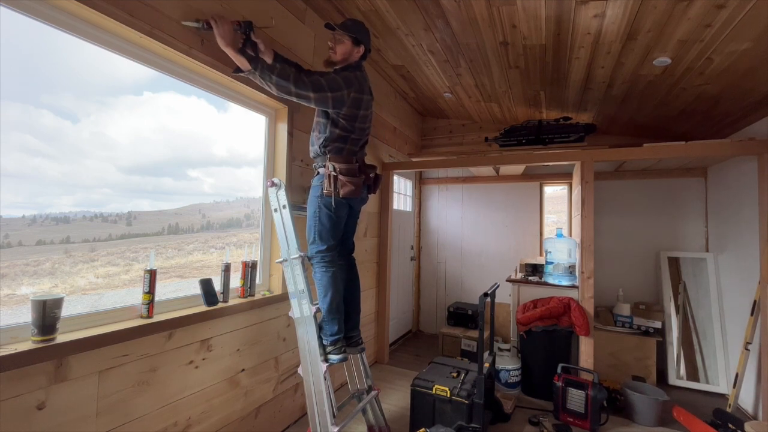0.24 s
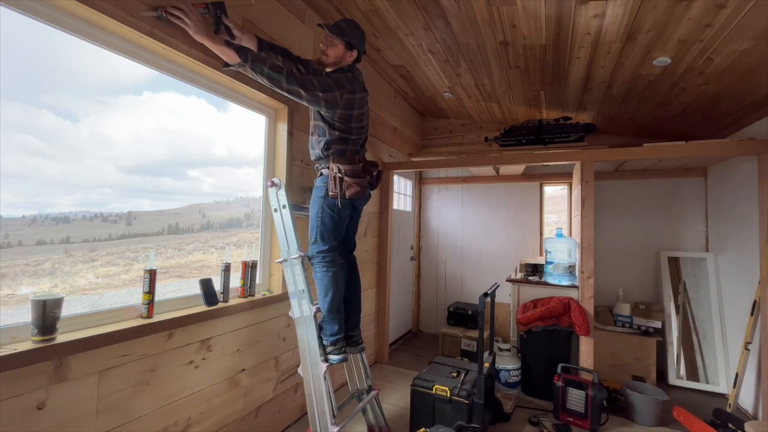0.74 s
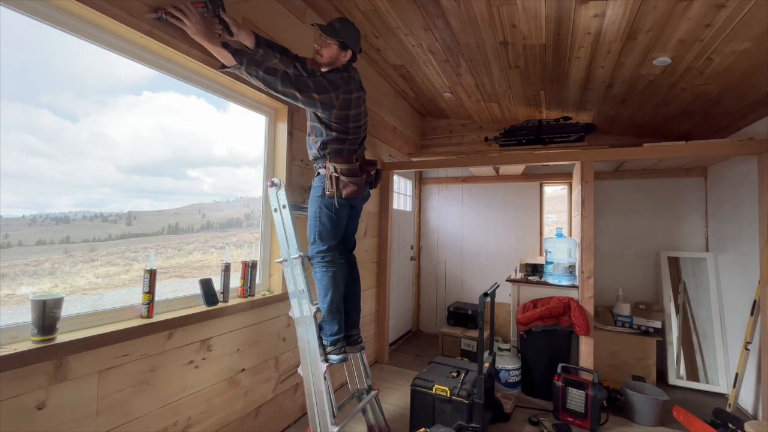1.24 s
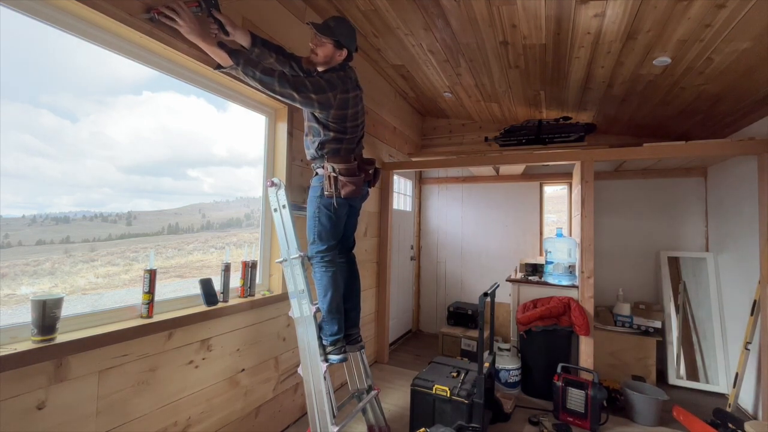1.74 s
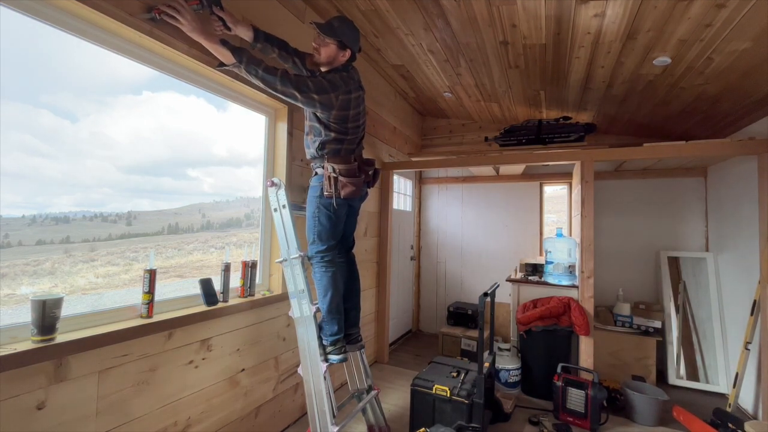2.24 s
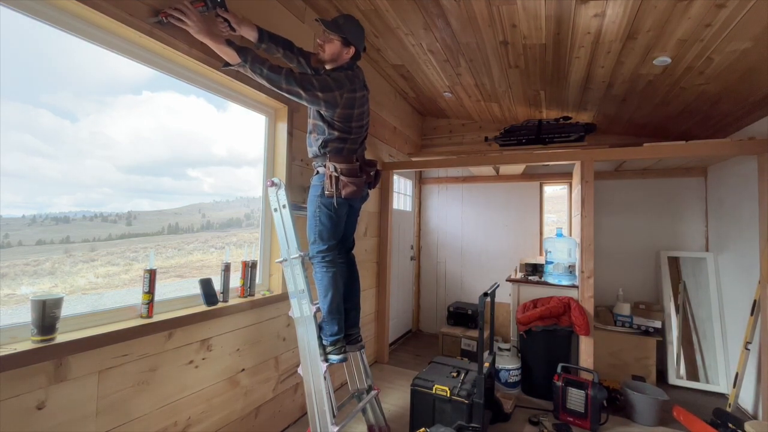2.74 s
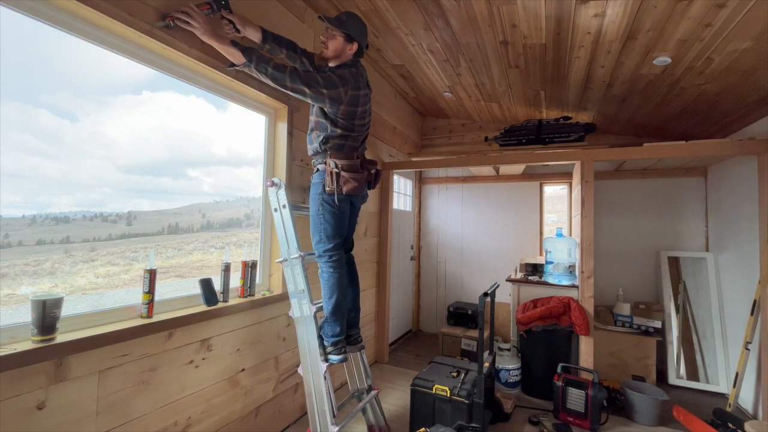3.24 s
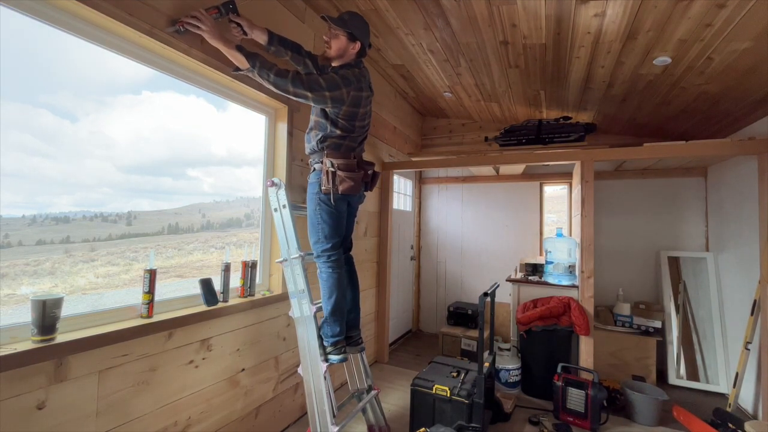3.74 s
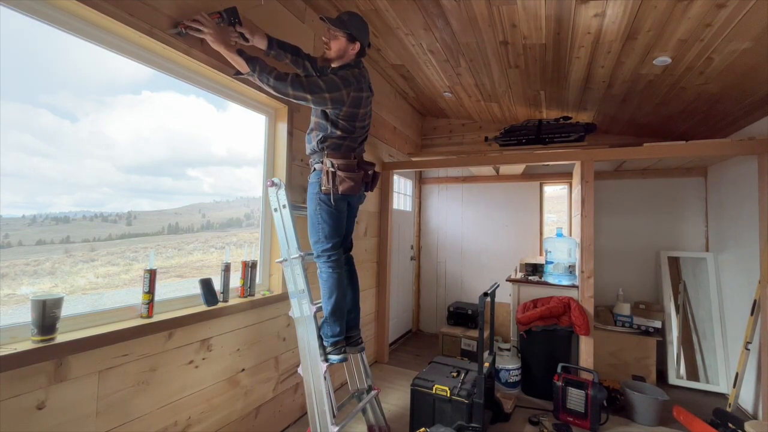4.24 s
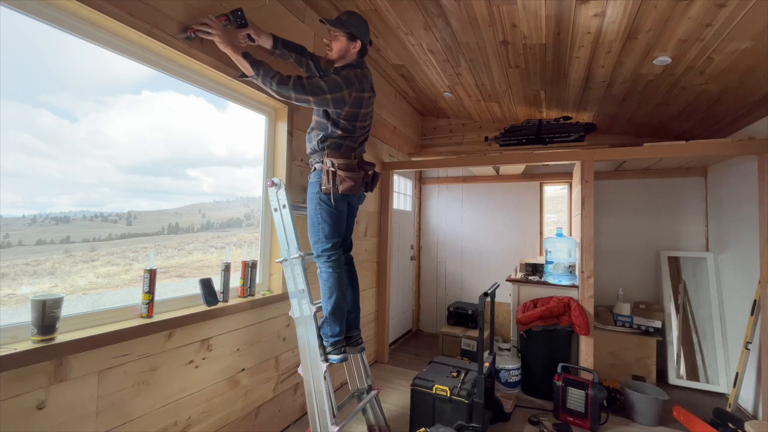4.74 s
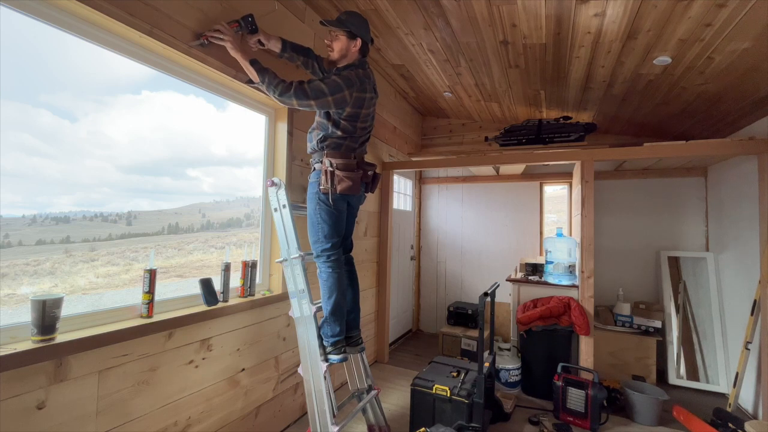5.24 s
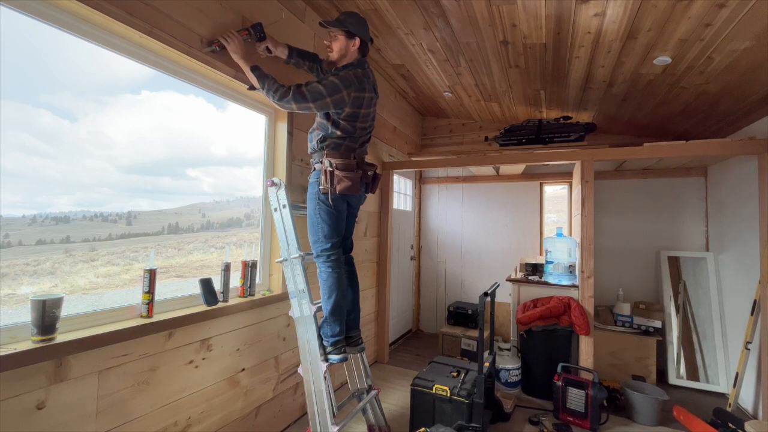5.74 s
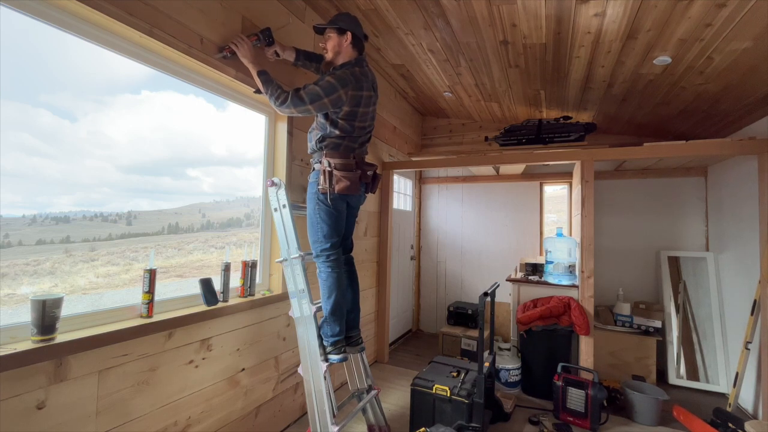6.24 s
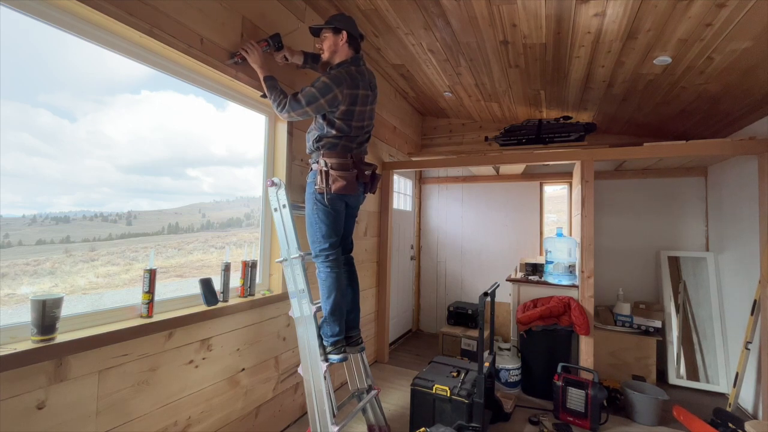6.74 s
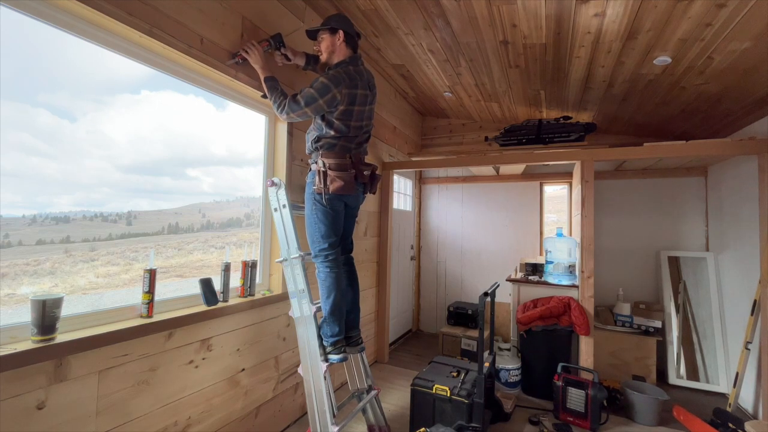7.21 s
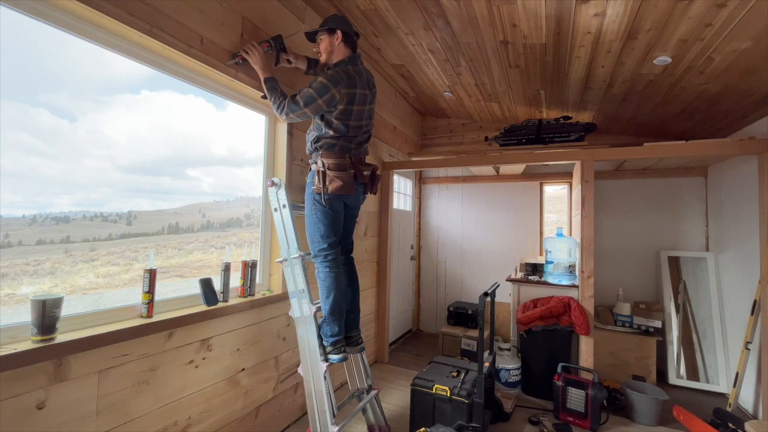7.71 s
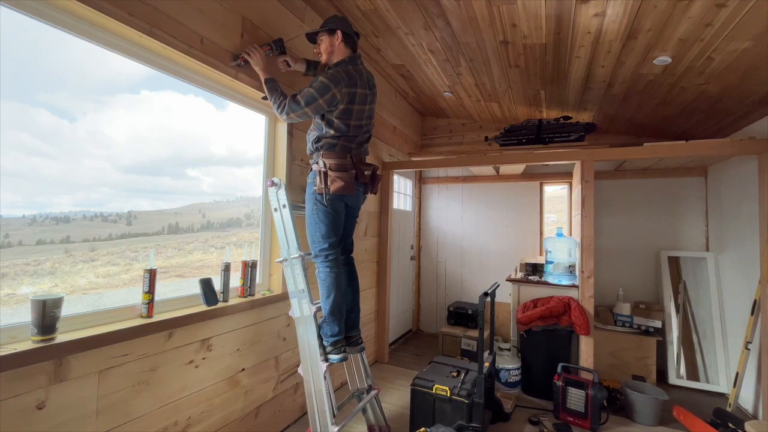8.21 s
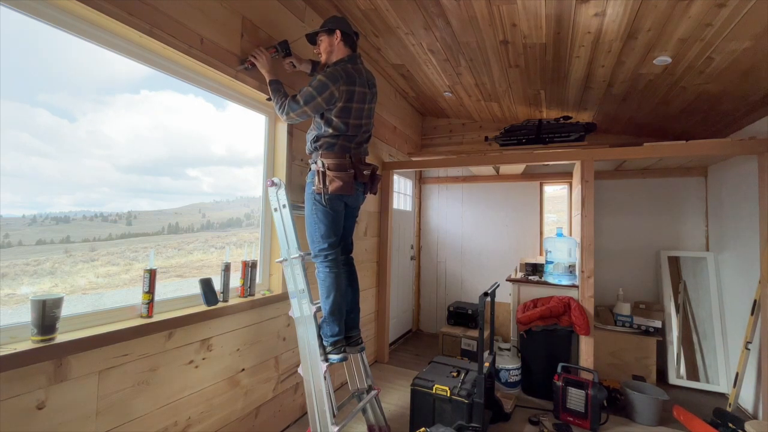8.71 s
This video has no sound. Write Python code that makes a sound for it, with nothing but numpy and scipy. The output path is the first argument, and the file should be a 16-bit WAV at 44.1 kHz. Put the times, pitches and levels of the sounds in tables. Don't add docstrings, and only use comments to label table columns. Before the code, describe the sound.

In a small wooden cabin, a metal caulking gun is worked a few metres from a stereo microphone. Light ticks, small dry ladder pips and sleeve rubs come first, with a full palm thump on a ceiling board. After a quiet gap, one sharp steel snap rings out; later come clusters of harder clacks with loose rattles. A short woody echo follows each over a faint outdoor hush.

```python
import sys
import numpy as np
from scipy import signal
from scipy.fft import rfft, irfft, next_fast_len
from scipy.io import wavfile
from scipy.ndimage import uniform_filter1d

SR = 44100
rng = np.random.default_rng(int(sys.argv[2]) if len(sys.argv) > 2 else 0)


def pcm_store(signal):
    levels = np.round(np.clip(np.atleast_2d(signal), -1, 1) * 32767)
    wavfile.write(sys.argv[1], SR, levels.astype(np.int16).T)


def invert_db(level):
    return 10 ** (np.asarray(level, dtype=float) / 20)


N = 395577


def at_hz(curve, hz):
    curve_hz, value = np.transpose(curve)
    return np.interp(np.log(np.maximum(hz, 1)), np.log(curve_hz), value)


def add(track, s, sound):
    i = int(s * SR)
    track[i:i + len(sound)] += sound[:len(track) - i]


def ring(modes, detune=0.0096):
    t = np.arange(SR // 10) / SR
    hz, db, t60 = np.transpose(modes)[:, :, None]
    sign = (-1) ** np.arange(len(modes))[:, None]
    hz = hz * (1 + detune * rng.standard_normal((len(modes), 1)))
    envelope = invert_db(db - 60 * t / np.maximum(t60, .0015))
    y = np.sum(sign * envelope * np.sin(2 * np.pi * hz * t), axis=0)
    return y / np.sqrt(np.sum(y ** 2))


def gun(blows, rattle_s, edge_db, echo_db=1.5):
    # (frequency [Hz], level [dB], t60 [s])
    barrel = [(170.1, -1, .06), (340, -2, 0.056), (443.3, -2, 0.074), (635, -14, 0.027),
              (920.8, -11.5, 0.0096)]
    frame = [(1180, -1.5, 0.015), (1400, 0.5, 0.019), (1641, -2, 0.031), (2100, 10, 0.0037)]
    plate = [(2782, -1.5, 0.0073), (3400, -1.5, 0.0034), (3740, -14.5, 0.039), (4250, -2.5, 0.0061),
             (4740, -16, .07), (4900, -1.5, 0.0044), (5430, -3.5, 0.0065), (5700, -19.5, 0.079),
             (6390, -3.5, 0.0065)]
    spring = [(7100, -3.5, 0.003), (8450, -3.5, 0.0043), (9500, -5.5, 0.0063), (9560, -16.5, 0.042),
              (10210, -5, .006), (11550, -3, 0.0056), (12500, -7, 0.0023)]
    edge = [(13700, -14.5, 0.01), (14800, -1, .003), (15400, -5.5, 0.0021)]
    part_db = [0, -10.5, -8, -6.5, -8.5]
    out = np.zeros((2, N))
    t = np.arange(int(2 * rattle_s * SR)) / SR
    for s, db, hz, barrel_db, plate_db, spring_db in blows:
        chatter = rng.standard_normal(len(t)) * (t / rattle_s) ** 0.4 * np.exp(-(t / rattle_s) ** 3)
        chatter = chatter / np.sqrt(np.sum(chatter ** 2))
        spot = [(hz, 0, .008)]
        spot_db = plate_db + 3 if hz > 2600 else 0
        levels = np.add([barrel_db, 0, plate_db, spring_db, spot_db, spring_db + edge_db], [*part_db, 0])
        gains = invert_db(db + levels) * np.sqrt(rattle_s * SR)
        body = sum(gain * ring(part) for gain, part in zip(gains, (barrel, frame, plate, spring, spot, edge)))
        add(out[0], s - .0015, signal.fftconvolve(body, chatter))
        add(out[1], s + rattle_s / 2, body * invert_db(echo_db))
    return out


def sprung(blows, per_plate_db, per_frame_db, offset_db):
    return [(*b, per_plate_db * b[-1] + per_frame_db * (b[1] + 42) + offset_db) for b in blows]


def snap_and_clacks():
    # (time [s], frame peak [dB], pitch of struck spot [Hz], barrel re frame [dB], plate re frame [dB])
    snap = [
        (3.917, -24.5, 1450, -15, .5),
    ]
    clacks = [
        (0.2575, -45, 1120, -15, -11),
        (0.903, -44, 1310, -8, -.5),
        (4.529, -43, 4290, -30, 10),
        (6.819, -42, 3250, -14.5, -1),
        (6.939, -28, 1550, -10, -7),
        (7.179, -43, 1300, -1, -1),
        (7.534, -31, 2100, -4.5, -7),
        (7.799, -40, 1340, -6.5, -4.5),
        (8.8255, -45.5, 3000, -16, -0.5),
        (8.943, -27.5, 1510, -20, -8.5),
    ]
    rattle_s = .006
    sharp = gun(sprung(snap, 1.1, .01, .3), rattle_s, edge_db=-7)
    return sharp + gun(sprung(clacks, 1.9, .7, -5), rattle_s, edge_db=-14)


def slack():
    # (time [s], frame peak [dB], pitch of struck spot [Hz], barrel re frame [dB], plate re frame [dB])
    leads = [(3.755, -56.5, 1450, -12, -9), (3.882, -57.5, 1780, -17, 6), (6.788, -70, 1700, -21.5, -3),
             (6.908, -51, 1730, -5.5, -5), (7.163, -43, 1400, -14, -7), (7.500, -54.5, 1550, -4.5, -7),
             (7.747, -55, 1570, -8, -15), (7.776, -51, 1400, -12, -8), (8.918, -46, 1480, -9.5, -4)]
    return gun(sprung(leads, .4, -.15, -13), rattle_s=0.018, edge_db=-18)


def ticks():
    # (time [s], frame peak [dB], pitch [Hz], plate re frame [dB], spring re frame [dB])
    plate_ticks = [(0.586, -51, 1690, -9, -12), (0.680, -57.5, 4000, 7.5, -21),
                   (1.251, -43.5, 1000, -12, -20), (2.220, -56.5, 1220, -10, -11),
                   (2.248, -54, 1250, -14.5, -11), (3.135, -65.5, 1350, -16, 1.5),
                   (4.479, -57, 4250, 11, -6.5), (4.500, -56.5, 4340, 10, -12), (4.520, -68, 5550, 6, 2),
                   (5.508, -72, 1424, -6, -2), (6.682, -60, 1440, -3, -9), (8.519, -63, 1540, -12, -18)]
    barrel_db = -30
    blows = [(s, db, hz, barrel_db, plate_db, spring_db) for s, db, hz, plate_db, spring_db in plate_ticks]
    return gun(blows, rattle_s=0.0017, edge_db=-12, echo_db=-1)


def thumps():
    # (time [s], peak level [dB])
    palm_hits = [
        (1.251, -19.5),
        (1.626, -45),
        (4.108, -47.5),
        (7.7, -59),
    ]
    # (frequency [Hz], level [dB], t60 [s])
    board = [(68, -22.5, 0.2), (139, -3.5, 0.024), (182.2, 8.5, 0.041), (244, 1.5, 0.014), (342, -4, 0.13),
             (463, -1.5, 0.028), (623, -8, 0.02), (890, -13, 0.037), (1024, -11, 0.013), (1400, -17, 0.011),
             (1750, -21, 0.0081), (2410, -23, 0.0047), (4000, -27, 0.0024), (8950, -30, .002)]
    out = np.zeros(N)
    for s, db in palm_hits:
        add(out, s, invert_db(db + 16) * ring(board))
    return out * invert_db([[-6], [6]])


def pips():
    # (time [s], peak level [dB], pitch [Hz])
    joint_pips = [(0.049, -50, 1200), (0.257, -44, 1110), (0.515, -43.5, 1030), (0.737, -42.5, 1340),
                  (0.995, -42, 1010), (1.016, -43.5, 1100), (1.017, -51, 861), (2.173, -45.5, 942),
                  (5.64, -48, 1350)]
    out = np.zeros(N)
    t = np.arange(SR // 100) / SR
    for s, db, hz in joint_pips:
        envelope = (t / 0.0016) * np.exp(1 - t / .0012)
        add(out, s - .001, invert_db(db + 1) * envelope * np.sin(2 * np.pi * hz * t))
    return out


def bands(length, alike_hz, low_hz=22, count=29):
    size = next_fast_len(length)
    f = np.arange(size // 2 + 1) * SR / size
    mid, side = rfft(rng.standard_normal((2, size)))
    share = np.sqrt(.5 / (1 + (alike_hz / np.maximum(f, 1)) ** 2))
    pair = mid * np.sqrt(1 - share ** 2) + side * share * np.array([[1], [-1]])
    pair, octave = pair.astype(np.complex64), np.log2(np.maximum(f, 1)).astype(np.float32)
    for hz in low_hz * 2 ** (np.arange(count) / 3):
        slope = np.clip(3 * (octave - float(np.log2(hz))), -1, 1)
        yield hz, irfft(pair * np.cos(slope * np.pi / 2) ** 2, size)[:, :length]


def cabin(dry, wet):
    # (frequency [Hz], t60 [s])
    decay = [(60, 0.73), (200, 0.4), (700, 0.28), (2000, 0.58), (5000, 0.45), (9000, 0.37), (15000, 0.083)]
    start_s, near_walls, near_s = 0.0075, 0.81, 0.045
    t = np.arange(int(.7 * SR)) / SR
    tail = sum(b * invert_db(-60 * t / at_hz(decay, hz)) for hz, b in bands(len(t), alike_hz=339))
    tail = tail * np.clip(t / start_s, 0, 1) ** 2 * (1 + near_walls * np.exp(-t / near_s))
    tail = tail / np.sqrt(np.sum(tail ** 2) / 2)
    early = np.zeros((2, 128))
    early[:, 0] = 1
    early[[0, 1], [70, 79]] = invert_db(1)
    direct = signal.fftconvolve(dry[None], early, axes=1)[:, :N]
    return direct + signal.fftconvolve(wet[None], tail, axes=1)[:, :N]


def strokes(t):
    # (peak time [s], peak level [dB], time to swell 20 dB [s], time to fade 20 dB [s], low part [dB])
    rubs = [(0.0, -64, .05, .2, 9), (.262, -60, .03, .4, 4), (.68, -65.5, .008, .3, -3),
            (.89, -62.5, .3, .03, 10), (.906, -53, .02, .12, -4), (1.41, -70, .03, .3, 19),
            (1.53, -63, .25, .13, 14), (1.696, -71, .07, .06, 11), (2.094, -63, .06, .09, 9),
            (2.25, -66, .04, .15, 7), (2.34, -66, .3, .065, 12), (3.172, -80, .13, .07, 9),
            (3.31, -88, .25, .04, 27), (3.76, -75, .015, .9, 13), (3.9, -58, .07, .03, .1),
            (5.304, -83.5, .1, .05, -2.5), (5.508, -65.5, .006, .045, -40), (5.64, -75, .008, .1, 12),
            (6.542, -68, .012, .11, -3), (6.688, -73.5, .05, .2, 8), (6.79, -67, .008, .04, .1)]
    s, db, swell, fade, low_db = np.transpose(rubs)[:, :, None]
    power = invert_db(2 * (db - 20 * np.where(t < s, (s - t) / swell, (t - s) / fade)))
    total = np.sum(power, axis=0) + 1e-11
    return 10 * np.log10(total), np.sum(power * low_db, axis=0) / total


def shakes(t):
    # (time [s], bass swell [dB], half length [s])
    swells = [(.85, 3.5, .2), (1.43, 8, .07), (2.17, 3, .1), (2.85, -5, .25), (4.06, 10, .12),
              (7.12, 7, .2), (7.67, 9, .17), (8.3, 4, .2), (8.97, 6, .25)]
    return 9.5 + sum(db * np.exp(-((t - s) / half) ** 2) for s, db, half in swells)


def walk(rate, step):
    k = int(SR / rate / step)
    held = np.repeat(rng.standard_normal(N // step // k + 2), k)
    y = uniform_filter1d(uniform_filter1d(held, k), k)[:-(-N // step)]
    return y / np.sqrt(np.mean(y ** 2))


def rub_and_hush():
    # (frequency [Hz], level per Hz [dB])
    rub_colour = [(120, -21), (200, -17.5), (348, -11), (647, -2.5), (791, -5.5), (1240, -4.5),
                  (1800, -7.5), (4600, -17), (6220, -21), (11000, -27), (14300, -55), (22000, -120)]
    hush_colour = [(15, -50), (25, -10), (59, -2), (187, -13), (274, -8), (303, -13), (635, -10.5),
                   (703, -19), (1400, -6.5), (1800, -13.5), (2210, -17.5), (6610, -37.5), (8310, -28),
                   (11000, -45.5), (14300, -74), (22000, -120)]
    step = 32
    t = np.arange(0, N, step) / SR
    rub_db, low_db = strokes(t)
    gust_db = shakes(t)

    def held(db):
        return np.repeat(invert_db(db).astype(np.float32), step)[:N]

    scratch_db, rub, hush = 2.0 * walk(60, step), 0, 0
    for hz, b in bands(N, alike_hz=157):
        flicker_db = walk(25, step)
        low_part_db = (low_db - 8) / (1 + (hz / 2200) ** 4)
        rub = rub + b * held(at_hz(rub_colour, min(hz, 10000)) + scratch_db + flicker_db + low_part_db)
        bass_db = gust_db / (1 + (hz / 450) ** 4)
        hush = hush + b * held(at_hz(hush_colour, hz) + 2.0 * flicker_db + bass_db)
    quiet = slice(int(5.85 * SR), int(6.4 * SR))
    hush = hush / np.std(hush[:, quiet]) * invert_db(-64 + 1.9)
    stroke_gain = uniform_filter1d(held(rub_db + .1), size=step)
    return hush + rub / np.std(rub[:, quiet]) * stroke_gain


def scene():
    dry, wet = snap_and_clacks() + slack() + ticks() + thumps()
    return cabin(dry, wet) + pips() + rub_and_hush()


def low_pass(x):
    return signal.sosfilt(signal.butter(12, 16800, fs=SR, output="sos"), x)


def record(dry):
    # (frequency [Hz], left minus right [dB])
    ports = [(60, -1.5), (110, -4), (200, -3), (380, -1.0), (700, -1), (1290, 5.5), (2380, 0), (4400, 6),
             (8120, -5.5), (15000, -2.5)]
    # (frequency [Hz], level [dB])
    sum_colour = [(24, -17.5), (40, -6), (5800, 5), (6700, -0.5), (7700, 4), (10800, 4.5), (11700, -2.5),
                  (12300, -25.5), (13000, -22), (13600, 1.5), (15500, 2), (16400, -33.5)]
    difference_colour = [(24, -15.5), (40, -1.5), (300, -3), (700, 4), (1400, 2.5), (9000, 5.5),
                         (12000, 2.5), (14200, 2.5), (15000, -10.5), (16400, -34.5)]
    right_lag = 10
    size = next_fast_len(N)
    f = np.arange(size // 2 + 1) * SR / size
    lean = at_hz(ports, f) / 2
    late = np.exp(-2j * np.pi * f * right_lag / SR * np.array([[0], [1]]))
    left, right = rfft(dry, size) * late * invert_db([lean, -lean])
    mid = (left + right) / 2 * invert_db(at_hz(sum_colour, f))
    side = (left - right) / 2 * invert_db(at_hz(difference_colour, f))
    mix = irfft(np.array([mid + side, mid - side]), size)[:, :N]
    return low_pass(mix)


dry = scene()
out = record(dry)
pcm_store(out)
```